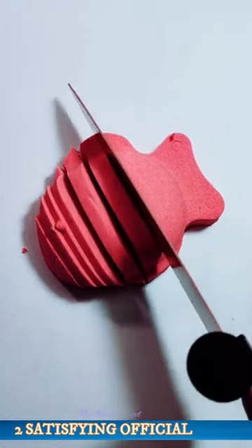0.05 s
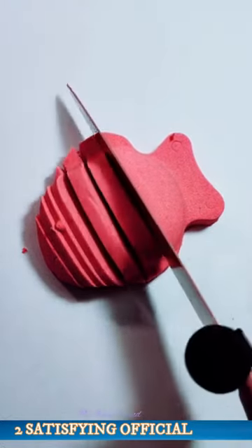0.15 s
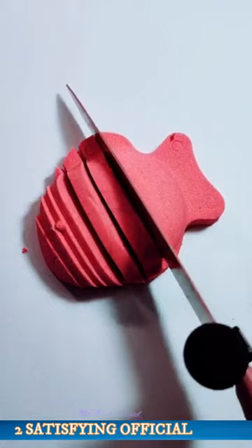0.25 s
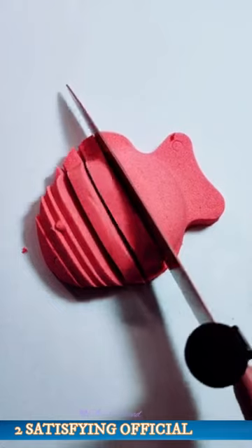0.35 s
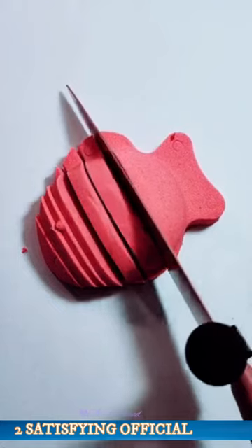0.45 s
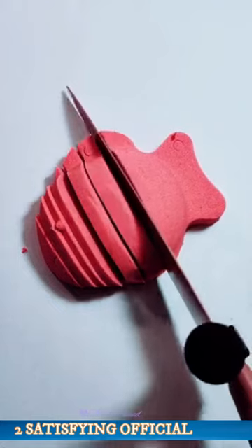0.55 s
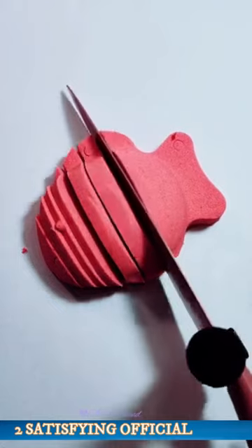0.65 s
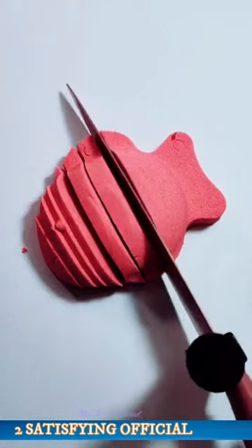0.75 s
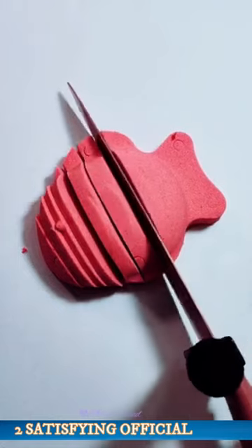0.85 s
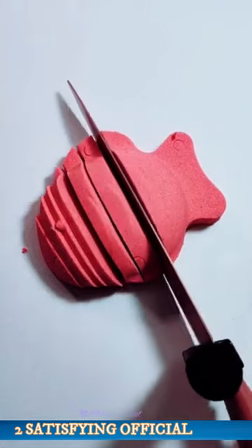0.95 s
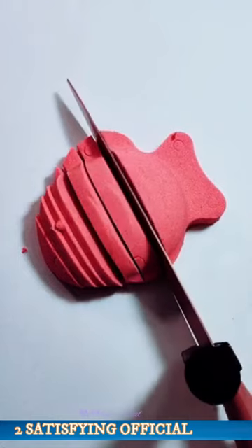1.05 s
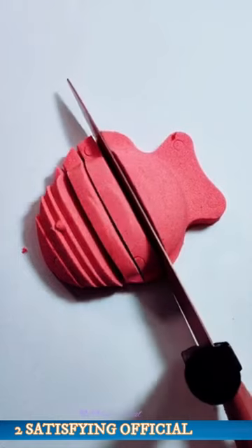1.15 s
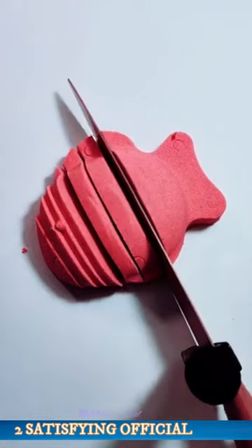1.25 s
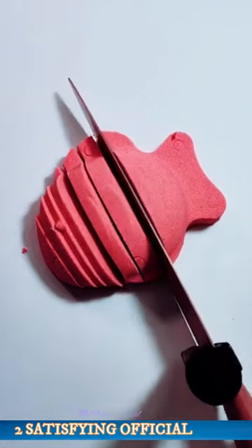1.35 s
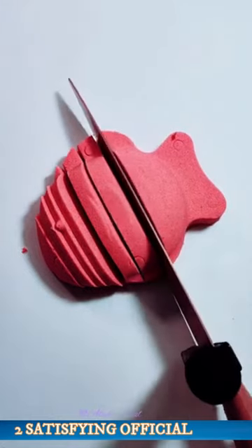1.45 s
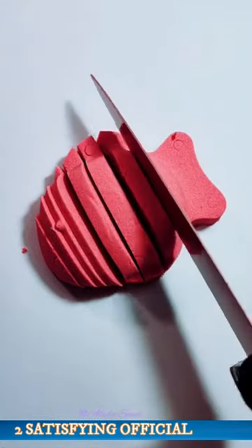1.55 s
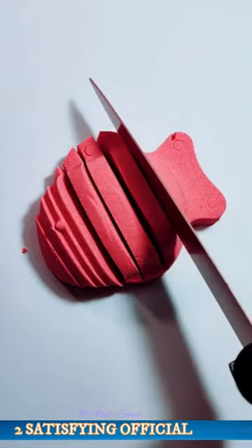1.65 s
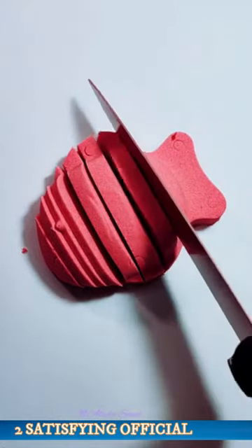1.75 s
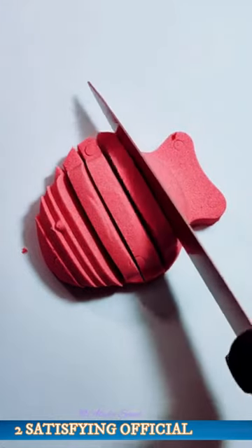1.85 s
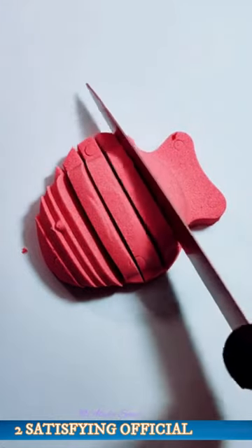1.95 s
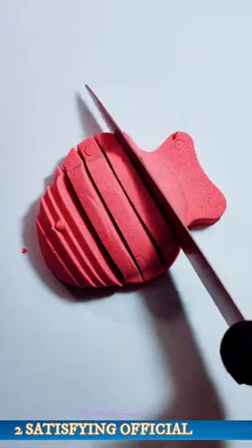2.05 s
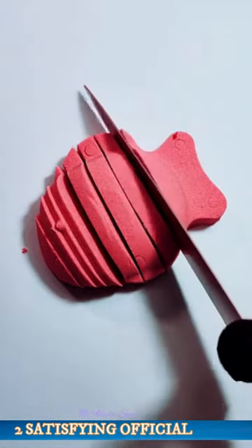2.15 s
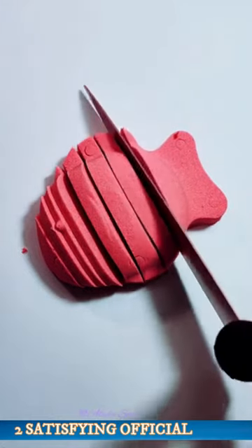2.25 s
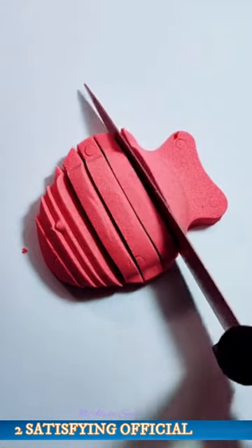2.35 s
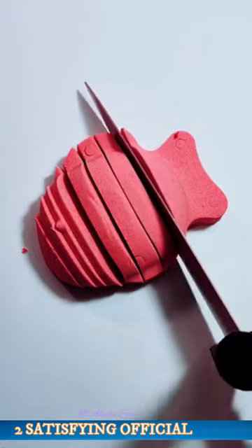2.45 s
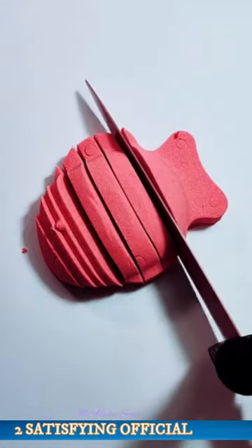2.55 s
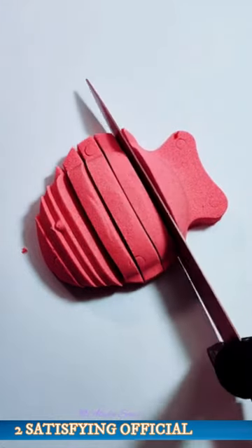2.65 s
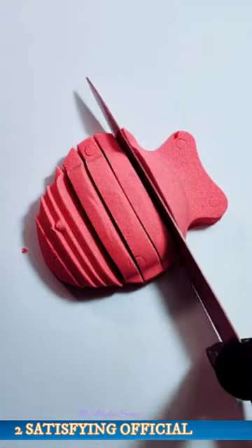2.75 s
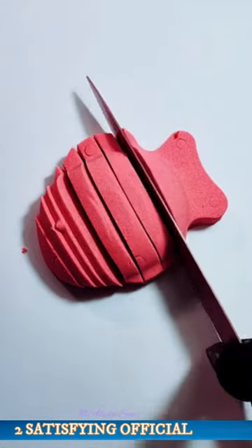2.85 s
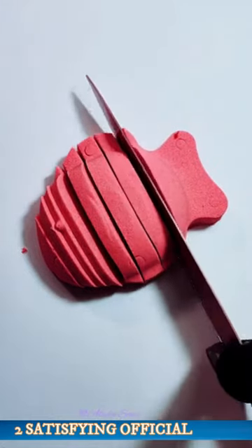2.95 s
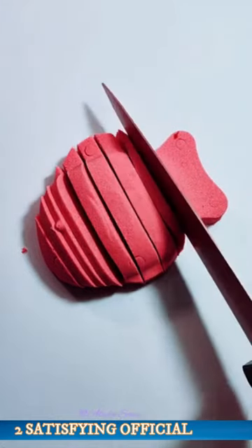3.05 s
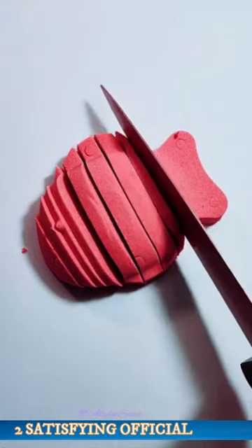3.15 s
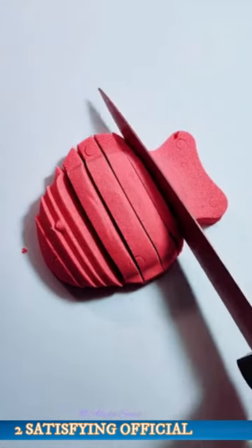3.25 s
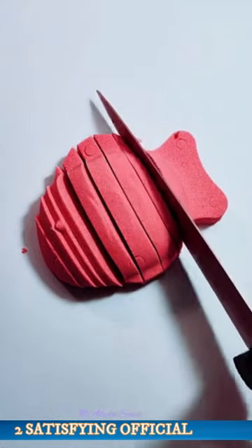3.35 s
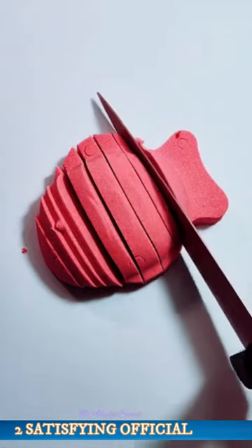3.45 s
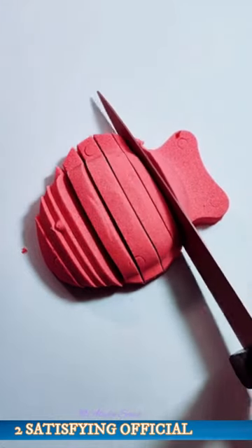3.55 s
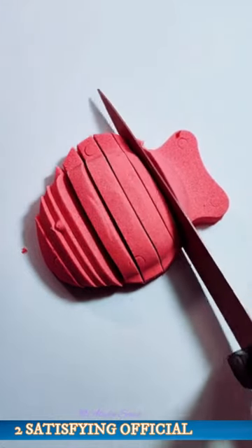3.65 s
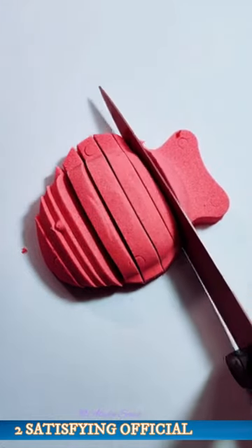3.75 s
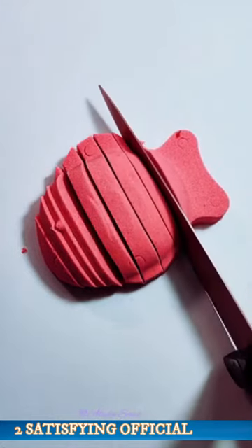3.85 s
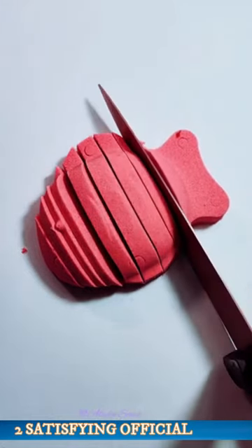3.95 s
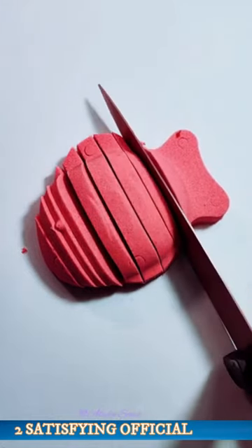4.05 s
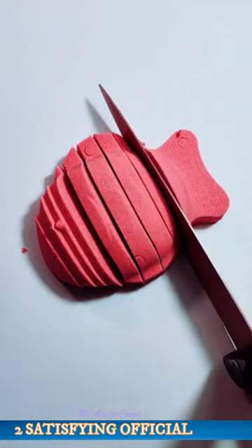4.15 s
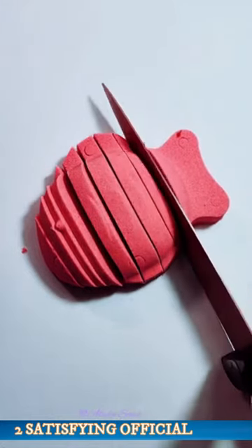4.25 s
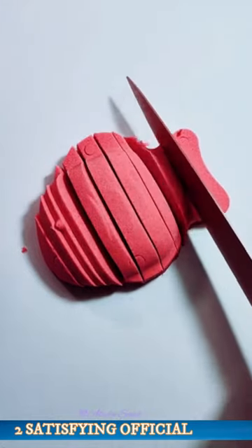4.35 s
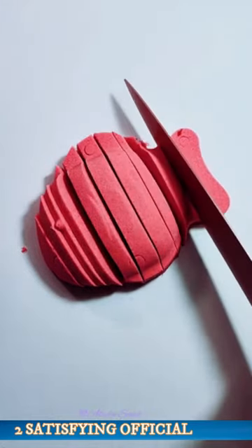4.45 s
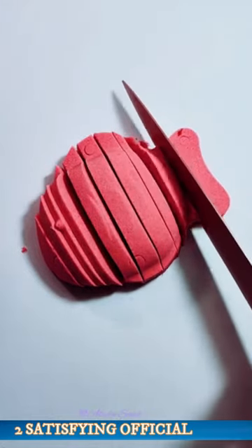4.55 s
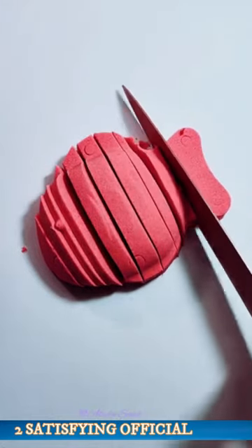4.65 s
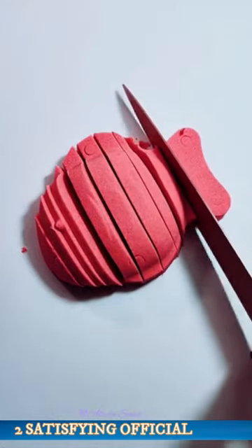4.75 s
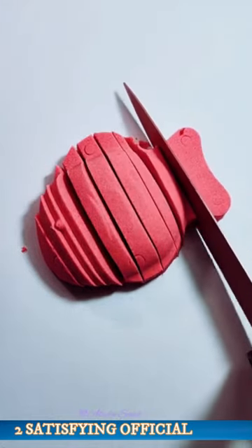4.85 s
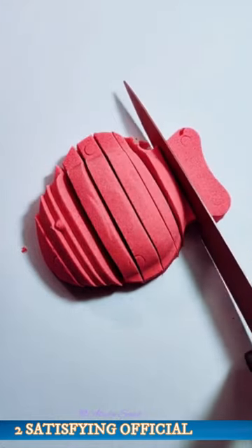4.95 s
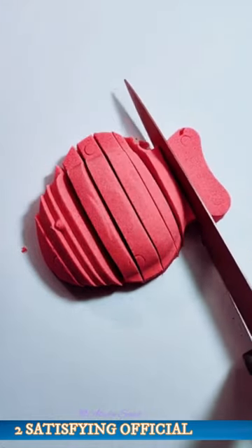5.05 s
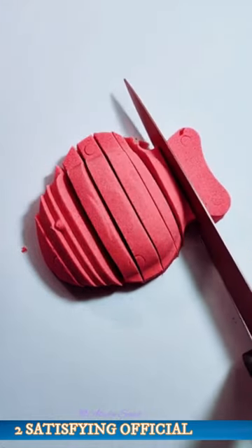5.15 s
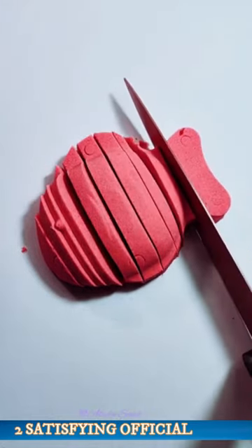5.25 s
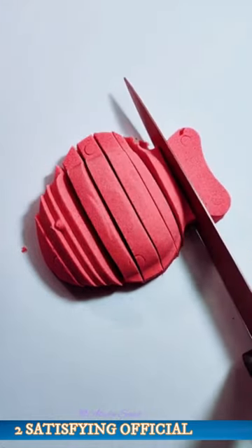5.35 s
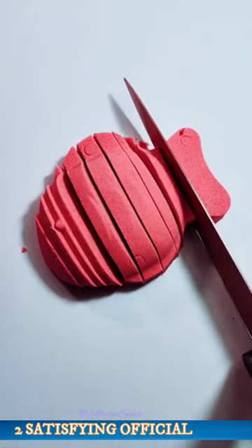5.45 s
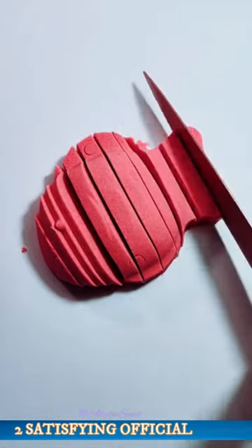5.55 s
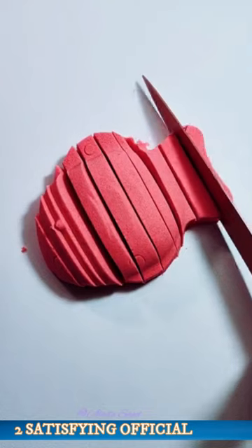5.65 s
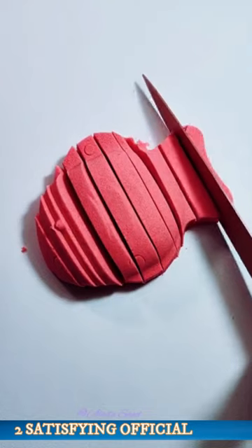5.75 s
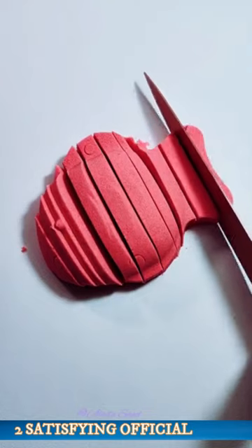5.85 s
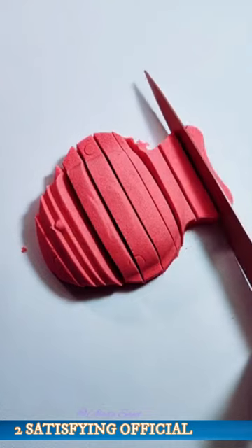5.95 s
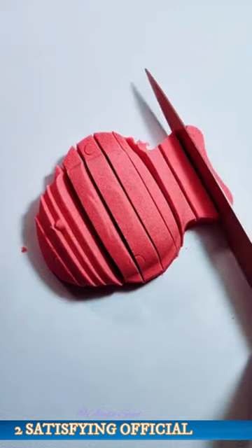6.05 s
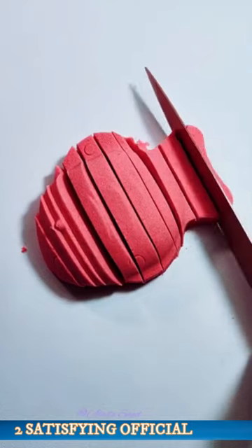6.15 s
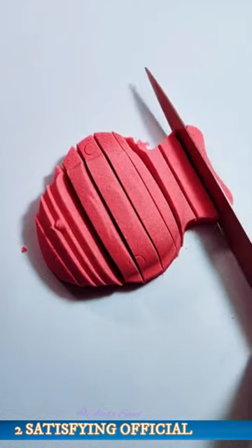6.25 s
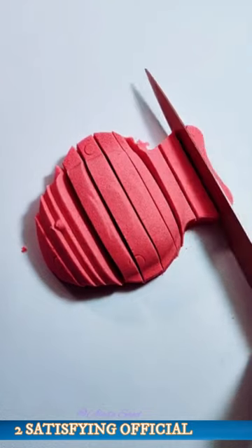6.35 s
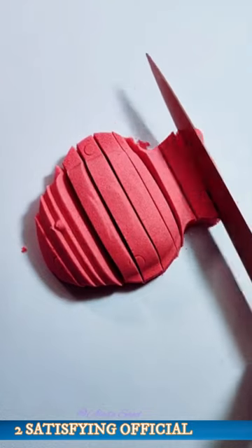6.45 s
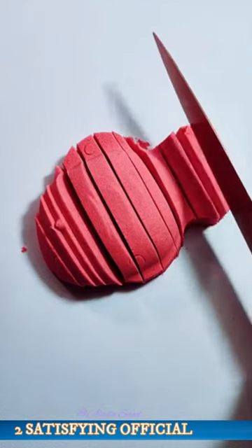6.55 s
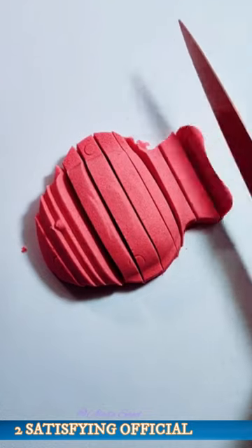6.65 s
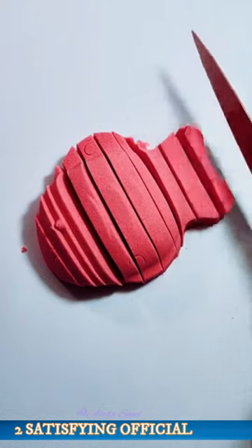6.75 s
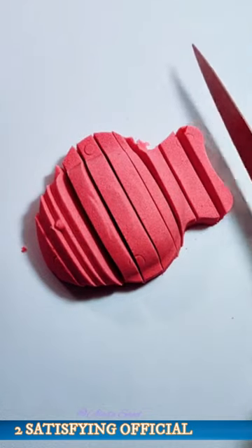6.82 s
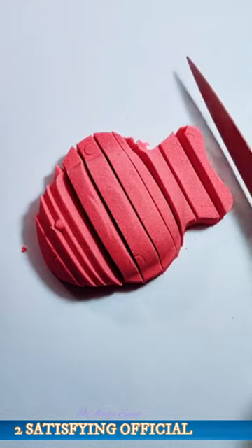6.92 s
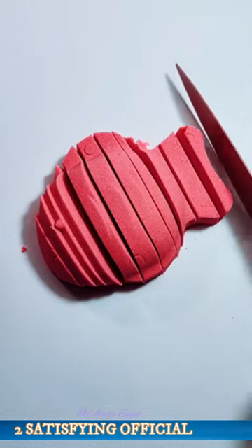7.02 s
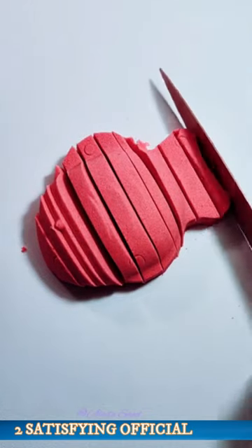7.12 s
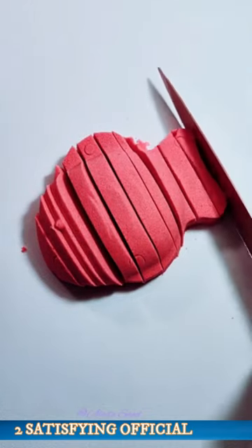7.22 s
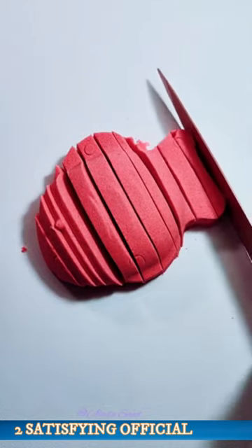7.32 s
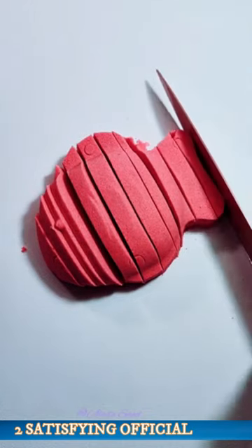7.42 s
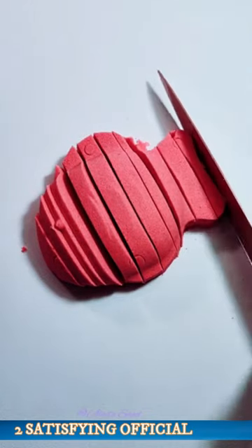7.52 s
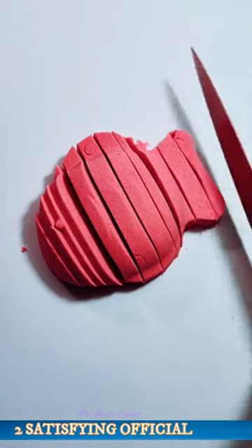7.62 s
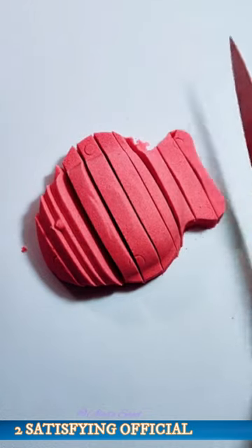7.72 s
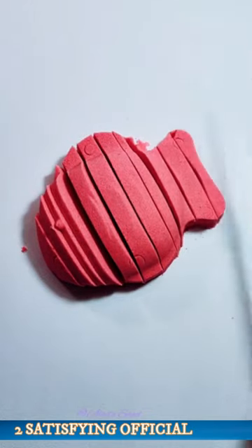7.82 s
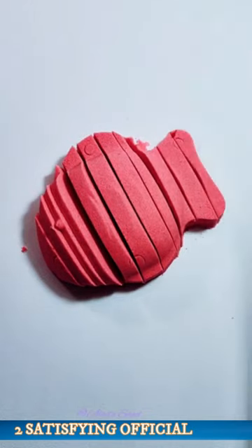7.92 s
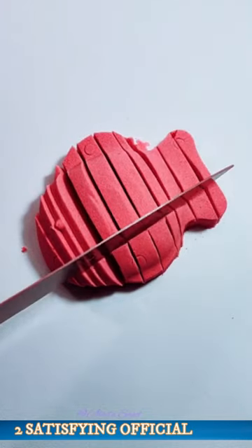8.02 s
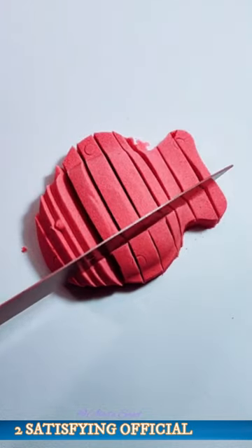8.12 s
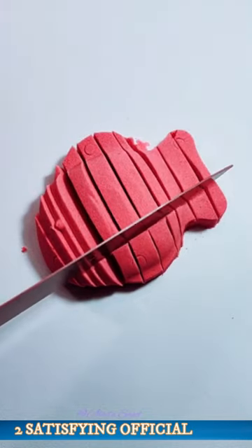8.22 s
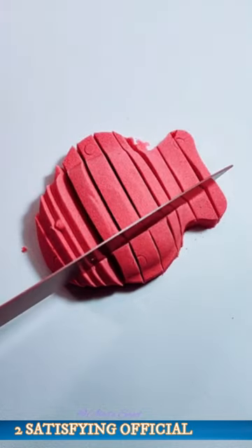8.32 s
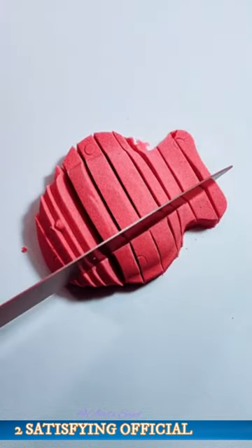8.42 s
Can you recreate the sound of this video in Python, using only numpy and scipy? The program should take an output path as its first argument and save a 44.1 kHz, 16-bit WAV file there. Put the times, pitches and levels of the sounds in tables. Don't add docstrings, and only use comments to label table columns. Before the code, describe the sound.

Close, dry sandy hiss swells as a blade cuts a sand block, snaps into crunches, thuds on the tabletop, then repeats with softer pauses.

```python
import sys
import numpy as np
from scipy import signal
from scipy.fft import rfft, irfft
from scipy.io import wavfile

SR = 44100
rng = np.random.default_rng(int(sys.argv[2]) if len(sys.argv) > 2 else 0)


def how_loud(loudness_db):
    steps = np.asarray(loudness_db, float) / 20
    return 10 ** steps


def to_wav(sig):
    pcm = np.clip(np.atleast_2d(sig), -1, 1) * 32767
    pcm = np.round(pcm).astype(np.int16)
    wavfile.write(sys.argv[1], SR, pcm.T)


N = 373968
HZ = np.maximum(np.fft.rfftfreq(N, 1 / SR), 1)

# start in seconds, end in seconds.
VIEWS = [
    (0, 1.555),
    (1.628, 3.114),
    (3.180, 4.366),
    (4.412, 5.538),
    (5.632, 8.051),
    (8.100, 8.48),
]
# time in seconds, fine grit level in dB.
PRESSING = [
    [(0.0, -31.5), (0.054, -32), (0.254, -31.5), (0.306, -29.5), (0.658, -33), (0.716, -30), (0.765, -31)],
    [(1.628, -39.5), (1.775, -32.5), (1.915, -35.5), (2.187, -29.5), (2.317, -32), (2.37, -30),
     (2.395, -26.5)],
    [(3.18, -40.5), (3.228, -33), (3.308, -32.5), (3.362, -30.5), (3.57, -33), (3.61, -30)],
    [(4.412, -51.5), (4.45, -43), (4.51, -38.5), (4.604, -32.5), (4.79, -33), (4.82, -28)],
    [(5.632, -41.5), (5.646, -37), (5.662, -34), (5.795, -35.5), (5.825, -28.5)],
    [(8.104, -77), (8.236, -59.5), (8.272, -62), (8.41, -48.5), (8.48, -48.5)],
]
# time in seconds, grit level in dB,
# grit fading in dB/s, rumble level in dB, rumble fading in dB/s.
LANDINGS = [
    (0.77, -34.5, 57.5, -48, 19.5),
    (2.397, -33, 64, -40.5, 23),
    (3.614, -42, 49, -36.5, 43.5),
    (4.827, -41.5, 49, -37.5, 39),
    (5.83, -47, 38, -39, 44.5),
    (7.17, -75, 70, -38, 98),
]
PRESS_SHARE_DB = [-2, -10, -5.5, -14.5]
PRESS_FOLLOWS = [0.88, 0.95, 1.07, 1]
DEPTH_GAIN_DB = [0.5, 1, -1, -1]

# time in seconds, fine grit peak in dB, coarse grit share in dB,
# blade flexing share in dB, dying time in ms.
CRACKS = [(0.7698, -16, -6.5, -9, 2.7), (1.1345, -14, -10.5, 0, 1.8), (1.1427, -16, -0.5, 3.5, 2.2),
          (1.2142, -17.5, 2, -2, 1.6), (2.4046, -19.5, -9.5, -7, 4.3), (2.613, -17, -8, -1.5, 1.9),
          (2.6604, -19, -2, 4, 4.6), (3.0315, -26.5, -11, -1, 2.1), (2.7752, -13, 0, 1, 1.8),
          (2.8266, -15, -17, -8, 2.8), (2.8918, -19, -14, -6.5, 2.3), (3.043, -20.5, -14.5, -6.5, 0.83),
          (3.6033, -18, -9, -5, 1.4), (3.6143, -13.5, -9, -4.5, 3.1), (3.633, -21, -11, -21, 2.4),
          (3.8584, -18.5, -5, 1, 2.6), (3.8656, -20, -3, -0.5, 9.8), (3.932, -11.5, -9, -5.5, 3.9),
          (4.8228, -9, -4.5, 2, 1.4), (4.9258, -16.5, -3.5, 0, 2.5), (5.1123, -16, -10.5, -4.5, 4.2),
          (5.8219, -15, -5, 3, 3.4), (6.1589, -20.5, -6.5, -13.5, 1), (6.1714, -22.5, -7.5, -11, 1.9)]
# time in seconds, fine grit peak in dB, dying time in ms.
STEEL_TICKS = [(0.7486, -27, 2.7), (0.9882, -30, 2.3), (1.2878, -41.5, 2.3), (2.679, -30, 6.2),
               (2.697, -31, 4.3), (2.874, -40, 2.6), (2.9198, -23.5, 0.82), (3.65, -28.5, 5.5),
               (3.7668, -28.5, 0.69), (3.782, -15.5, 1.15), (3.8342, -22, 5.1), (4.026, -34, 4),
               (4.0392, -28.5, 3.4), (4.837, -28, 3.6), (4.9043, -24.5, 4.3), (4.967, -32.5, 2.8),
               (4.993, -43, 2.4), (5.028, -32.5, 1.6), (5.0873, -32.5, 9.5), (5.131, -30.5, 2.7),
               (5.1975, -31, 1.3), (5.842, -25, 7.8), (5.9174, -39, 4.8), (5.965, -45, 2.9),
               (6.0045, -34.5, 4.1), (6.072, -43, 3), (6.101, -45, 2.4), (7.157, -39, 8.3),
               (8.439, -48, 4.5)]
# time in seconds, fine grit peak in dB,
# dying time in ms.
SAND_TICKS = [(1.0554, -41, 3), (1.082, -34.5, 1.9), (1.159, -27, 10), (1.197, -29, 4.8), (1.374, -49, 2.6),
              (1.42, -65, 3.1), (2.4548, -36, 2.6), (2.483, -30, 4.5), (2.5027, -23, 4.7), (2.511, -29, 4),
              (2.751, -32, 2.1), (2.766, -29, 2.6), (2.7927, -16, 1.2), (3.686, -28.5, 4.1),
              (3.807, -22.5, 3.5), (3.894, -18.5, 6.6), (3.9115, -17.5, 1.3), (3.987, -37, 3.2),
              (4, -35.5, 8.2), (4.0497, -27, 2.2), (4.859, -33, 6.5), (5.206, -36, 2), (5.8614, -35, 5.9),
              (6.0566, -44, 3.4), (7.44, -56.5, 2), (7.6986, -54.5, 1.5)]
# frequency in Hz, width in Hz, level in dB.
BLADE = [(1022, 93, -9.5), (1400, 312, -3), (1773, 170, -5.5), (2052, 300, -8), (2271, 670, -12.5),
         (2930, 420, -9.5), (3620, 320, -6), (4950, 290, -16.5), (5736, 350, -17.5), (6890, 240, -18),
         (7900, 350, -17.5), (9110, 550, -12), (10500, 480, -11), (12060, 380, -4.5), (13430, 700, 0),
         (14650, 320, -4.5), (15220, 600, -5.5)]
# frequency in Hz, level in dB.
GRIT = [(700, -30.5), (1000, -11), (2500, -17), (4200, -25.5), (7000, -20), (11000, -20.5), (13000, -10.5),
        (16000, -15)]
BLADE_BANDS_HZ = [11000, 4100]

# time in seconds, peak in dB, deep thump share in dB,
# bright clack share in dB, settling time in ms.
KNOCKS = [(0.732, -42.5, 19.5, -2, 12), (0.77, -33.5, -23, 2.5, 42), (1.141, -26.5, -1.5, 7.5, 47),
          (1.215, -44, -16.5, 8, 58), (2.378, -50, 24, -13, 19), (2.437, -28.5, 4, -14, 9.2),
          (2.657, -33, 6.5, 18, 45), (2.775, -35.5, -6, 11, 33), (3.603, -11, -11.5, -4, 32),
          (3.785, -28.5, -30, 6, 28), (3.86, -20.5, -10, 0.5, 60), (3.934, -38, -27, 16, 2.6),
          (4.038, -35, 4, -7, 40), (4.822, -8, -4, -1.5, 63), (4.926, -23.5, -4, -1, 34),
          (5.111, -29, 2.5, -5, 60), (5.827, -9.5, 0, -20, 50), (7.159, -21, -2.5, -2, 27)]
# frequency in Hz, width in Hz, level in dB.
TABLE = [(71, 60, -25), (106.7, 21, 1.5), (126.3, 6.9, -0.5), (146.2, 8.5, 0.5), (189, 14, -7.5),
         (241.4, 34, -8), (285.7, 11, -7.5), (320, 75, -14.5), (379.4, 8.1, -8.5), (434.7, 25.7, -2),
         (679, 110, -10), (740, 84, -6.5), (856, 90, -9), (1024, 88, -7), (1490, 800, -22)]
TABLE_BANDS_HZ = [550, 200]

# time in seconds, fine grit level in dB, swell in ms,
# length in ms, dying time in ms.
BRUSHES = [
    (4.07, -55, 8, 43, 30),
    (4.358, -59, 4, 6, 4),
    (6.5, -60, 15, 100, 8),
    (6.585, -53, 7, 60, 14),
    (7.7, -62, 8, 25, 7.4),
    (7.79, -57, 10, 43, 26),
]
BRUSH_SHARE_DB = [-5, -10, -13, -8.5]
# start in seconds, length in seconds,
# frequency in Hz, level in dB.
SQUEAKS = [(5.278, .08, 4290, -65), (6.574, 0.051, 2120, -60), (6.582, 0.066, 3540, -58.5),
           (6.595, 0.061, 5680, -69), (6.675, 0.032, 2100, -66), (6.755, 0.045, 2110, -62),
           (6.8, .06, 2120, -73), (7.326, 0.036, 1330, -52.5), (7.383, 0.06, 4990, -60.5),
           (7.42, 0.075, 5030, -73), (7.695, 0.028, 10600, -55), (8.218, 0.16, 1390, -69.5),
           (8.147, 0.3, 10600, -71), (8.15, 0.23, 9050, -73)]
# time in seconds, chatter level in dB.
DRAG = [
    (7.16, -73),
    (7.175, -47),
    (7.201, -42.5),
    (7.25, -38.5),
    (7.284, -31.5),
    (7.298, -38.5),
    (7.305, -47.5),
    (7.312, -70),
    (7.37, -75),
]
DRAG_SHARE_DB = [-9.5, -21, -7.5, -6]
# frequency in Hz, width in Hz,
# level in dB.
FLAT = [(1280, 200, 1.5), (2180, 230, -4.5), (2880, 160, -4.5), (3470, 130, -3.5), (7900, 2000, -23)]
# frequency in Hz, density in dB per Hz.
ROOM_TONE = [(18, -40), (30, -2), (245, -6), (426, -11), (2480, -23.5), (2680, -24), (14000, -27.5),
             (16000, -28.5)]


def rms_one(x):
    return x / np.sqrt(np.mean(x ** 2) + 1e-20)


def layers(values):
    return np.array(values)[:, None]


def in_time(rows):
    s, *columns = np.transpose(rows)
    return [np.interp(np.arange(N) / SR, s, column) for column in columns]


def at_hz(points):
    hz, db = np.transpose(points)
    return how_loud(np.interp(np.log(HZ), np.log(hz), db))


def modes(table):
    response = 0
    for k, (hz, width, db) in enumerate(table):
        ring = 1j * HZ * width / (hz ** 2 - HZ ** 2 + 1j * HZ * width)
        response = response + (-1) ** k * how_loud(db) * ring
    return response


def steep(mode):
    hz, width, db = mode
    return how_loud(db) * modes([(hz, width, 0)]) ** 2


def through(x, response):
    return irfft(rfft(x) * response, N)


def level_kept(response):
    return response / np.sqrt(np.mean(np.abs(response) ** 2))


def bands(edges_hz, order):
    under_top, under_low = [1 / (1 + (HZ / hz) ** order) for hz in edges_hz]
    return 1 - under_top, under_top - under_low, under_low


def drift(rate):
    lowpass = signal.butter(2, rate, fs=SR / 32, output="sos")
    slow = signal.sosfilt(lowpass, rng.standard_normal(N // 32 + 2002))[2000:]
    return np.interp(np.arange(N) / 32, np.arange(len(slow)), rms_one(slow))


def grains(per_s, spread_db):
    sizes = how_loud(spread_db * np.minimum(rng.exponential(1, N), 5)) * rng.standard_normal(N)
    return rms_one(sizes * (rng.random(N) < per_s / SR))


def burst(s, swell_ms, dying_ms):
    ms = np.arange(round(.12 * SR)) / SR * 1000 - 15
    swell, dying = np.exp(ms / max(swell_ms, .1)), np.exp(-ms / max(dying_ms, .3))
    return round((s - .015) * SR), np.where(ms < 0, swell, dying)


def pressing():
    t, firm_db = np.arange(N) / SR, -35
    power = np.zeros((4, N))
    for cut in PRESSING:
        start, end = cut[0][0], cut[-1][0]
        depth = np.clip((t - start) / (end - start), 0, 1)
        db = layers(PRESS_SHARE_DB) + layers(PRESS_FOLLOWS) * (in_time(cut)[0] - firm_db) + firm_db
        power += how_loud(db + layers(DEPTH_GAIN_DB) * depth) ** 2 * (t >= start) * (t < end)
    return power


def settling():
    t = np.arange(N) / SR
    share_db, follows = layers([-2.5, -12, -9.5]), layers([0.95, 0.56, 0.56])
    creep_db, creep_fading = layers([-63, -68.5, -72, -67.5]), 18
    power = np.zeros((4, N))
    for s, grit_db, grit_fading, rumble_db, rumble_fading in LANDINGS:
        since = np.maximum(t - s, 0)
        grit = grit_db + share_db - follows * grit_fading * since
        relaxing = np.vstack([grit, rumble_db - rumble_fading * since])
        creep = creep_db - creep_fading * since
        power += (how_loud(relaxing) ** 2 + how_loud(creep) ** 2) * (t >= s)
    return power


def effort():
    drag_power = how_loud(dragging() + layers(DRAG_SHARE_DB)) ** 2
    return 10 * np.log10(1e-12 + pressing() + settling() + brushing() + drag_power)


def buried():
    t, db = np.arange(N) / SR, np.zeros(N)
    for cut in PRESSING[1:]:
        since = t - cut[0][0]
        db += -7.5 * np.exp(-np.maximum(since, 0) / 0.33) * (since >= 0)
    return how_loud(db)


def crunches():
    steel = [(s, db, -4.5, 2.5, ms) for s, db, ms in STEEL_TICKS]
    sand = [(s, db, -7, -5, ms) for s, db, ms in SAND_TICKS]
    trickle_db, dull_db, trickle_ms = -34.5, 4.5, 25
    for s, db, coarse_db, flex_db, ms in CRACKS + steel + sand:
        swell_ms = 1.1 + .12 * ms
        yield s, db, coarse_db, flex_db, swell_ms, ms
        yield s, db + trickle_db, coarse_db + dull_db, flex_db + dull_db, swell_ms, trickle_ms


def blade(levels):
    clumps = 0.68 * drift(6.3)
    steady = np.array([how_loud(db + clumps + 0.67 * drift(9.9)) for db in levels[:3]])
    slips = np.zeros_like(steady)
    for s, db, coarse_db, flex_db, swell_ms, dying_ms in crunches():
        at, shape = burst(s + .0013, swell_ms, dying_ms)
        slips[:, at:at + len(shape)] += how_loud(db + layers([0, coarse_db, flex_db]) - 6) * shape[:N - at]

    contacts = grains(per_s=15000, spread_db=1.0)
    scatter = grains(per_s=15000, spread_db=2.0)
    weights = bands(BLADE_BANDS_HZ, order=24)
    rings, between = [steep(mode) for mode in BLADE], at_hz(GRIT)
    whole = np.sqrt(sum(np.abs(ring) ** 2 for ring in rings) + between ** 2)
    scale = layers([1 / np.sqrt(np.mean((whole * weight) ** 2)) for weight in weights])

    sand_force = steady * buried() + how_loud(layers([1.5, 2.5, -2.5])) * slips
    crushed = scale * sand_force * scatter
    spectrum = between * sum(rfft(band) * weight for band, weight in zip(crushed, weights))
    struck = scale * (steady + slips) * contacts
    for mode, ring in zip(BLADE, rings):
        which = sum(mode[0] < hz for hz in BLADE_BANDS_HZ)
        grip = how_loud(.9 * drift(3) + 1.4 * drift(35))
        spectrum = spectrum + rfft(struck[which] * grip) * ring
    return irfft(spectrum, N)


def table(levels):
    steady = how_loud(levels[3] + 2.4 * drift(7)) * rng.standard_normal(N)
    top = modes(TABLE)
    rumble = top / (1 + (HZ / 360.0) ** 2) / (1 + (124.0 / HZ) ** 2)
    out = through(steady, level_kept(rumble))
    rings = [irfft(top * weight, N)[:SR // 2] for weight in bands(TABLE_BANDS_HZ, order=6)]
    for s, db, thump_db, clack_db, settling_ms in KNOCKS:
        at, shape = burst(s + 0.0011, 3.1, settling_ms)
        click = np.arange(len(shape)) == shape.argmax()
        rocking = rng.standard_normal(len(shape)) * shape
        for ring, share_db, rocked in zip(rings, [clack_db, 0, thump_db], [.025, .02, .02]):
            knock = signal.fftconvolve(click + rocked * rocking, ring)[:N - at]
            out[at:at + len(knock)] += how_loud(db + share_db - 3.5) * knock / np.abs(knock).max()
    return out


def brushing():
    t, power = np.arange(N) / SR, np.zeros((4, N))
    for s, db, swell_ms, length_ms, dying_ms in BRUSHES:
        ms = (t - s) * 1000
        swell = np.minimum(ms, 0) / swell_ms
        dying = np.maximum(ms - length_ms, 0) / dying_ms
        power += how_loud(db + layers(BRUSH_SHARE_DB)) ** 2 * np.exp(2 * swell - 2 * dying)
    return power


def squeaks():
    out, waver = np.zeros(N), how_loud(4.0 * drift(61.5))
    for s, length, hz, db in SQUEAKS:
        t = np.arange(round(length * SR)) / SR
        tone = np.sin(np.pi * t / length) * np.sin(2 * np.pi * hz * t)
        out[round(s * SR):][:len(t)] += how_loud(db) * tone
    return out * waver


def dragging():
    return in_time([(DRAG[0][0] - .005, -110), *DRAG, (DRAG[-1][0] + .02, -110)])[0]


def drag():
    chatter = how_loud(dragging() + 1.7 * drift(70)) * grains(per_s=4700, spread_db=-0.5)
    return through(chatter, level_kept(sum(map(steep, FLAT))))


def room_tone():
    db = -58.5 - 3 - 1.5 * (np.arange(N) > VIEWS[-1][0] * SR)
    return how_loud(db) * through(rng.standard_normal(N), level_kept(at_hz(ROOM_TONE)))


def room_tail(steel):
    t = np.arange(SR // 4) / SR
    tail = rms_one(rng.standard_normal(len(t))) * how_loud(-60 * t / 0.13) * (t > .003)
    return how_loud(-41) * signal.fftconvolve(steel, tail)[:N]


def scene():
    levels = effort()
    steel = blade(levels) + drag() + squeaks()
    return np.tile(steel + table(levels) + room_tail(steel) + room_tone(), (2, 1))


def low_pass(x):
    return signal.sosfilt(signal.butter(12, 16810, fs=SR, output="sos"), x)


def record(dry):
    t = np.arange(N) / SR
    running = sum((t >= start) & (t < end) for start, end in VIEWS)
    lowpass = signal.ellip(11, .5, 66, 15740, fs=SR, output="sos")
    mix = signal.sosfilt(lowpass, dry) * running
    return low_pass(mix)


dry = scene()
out = record(dry)
to_wav(out)
```